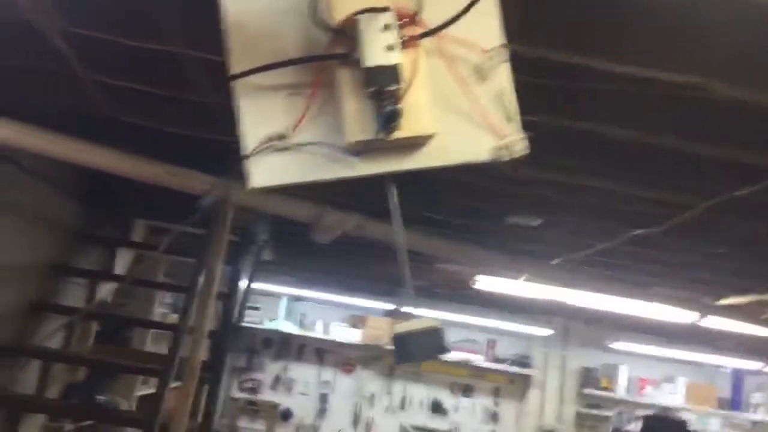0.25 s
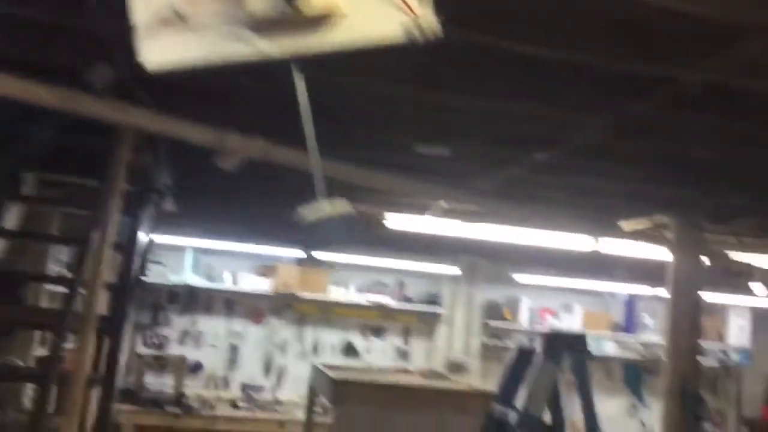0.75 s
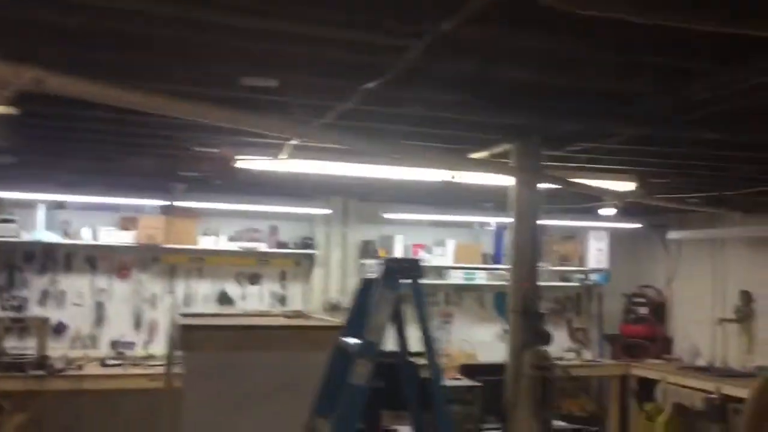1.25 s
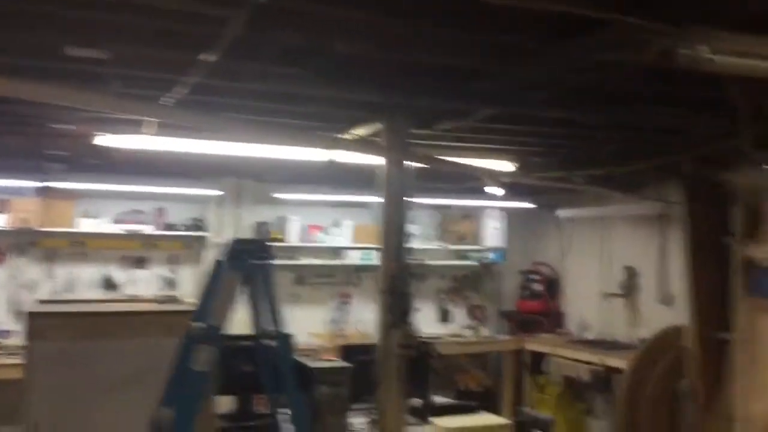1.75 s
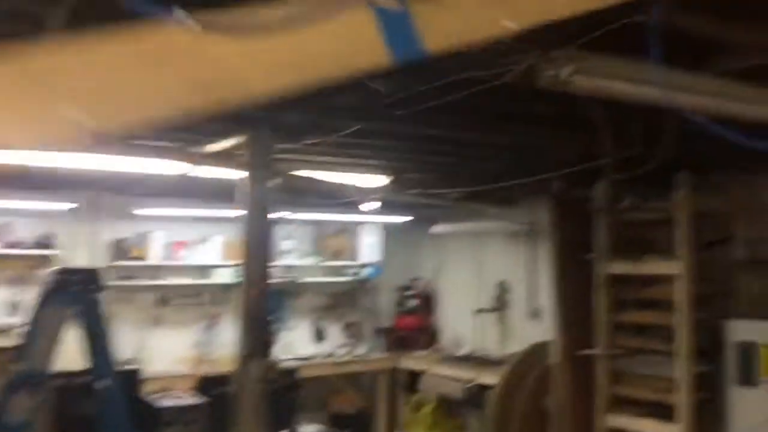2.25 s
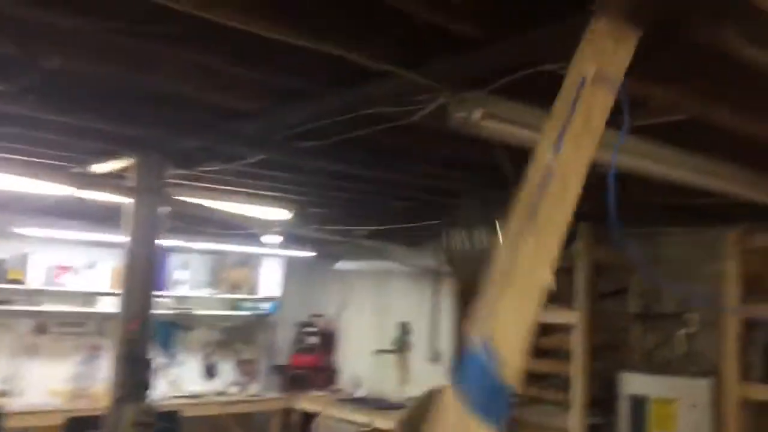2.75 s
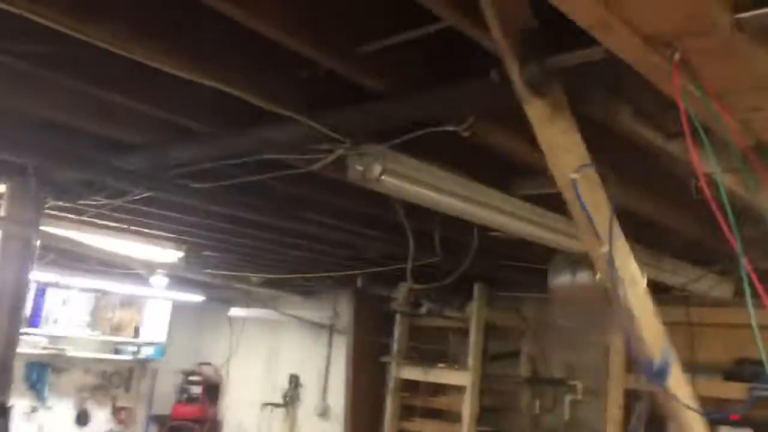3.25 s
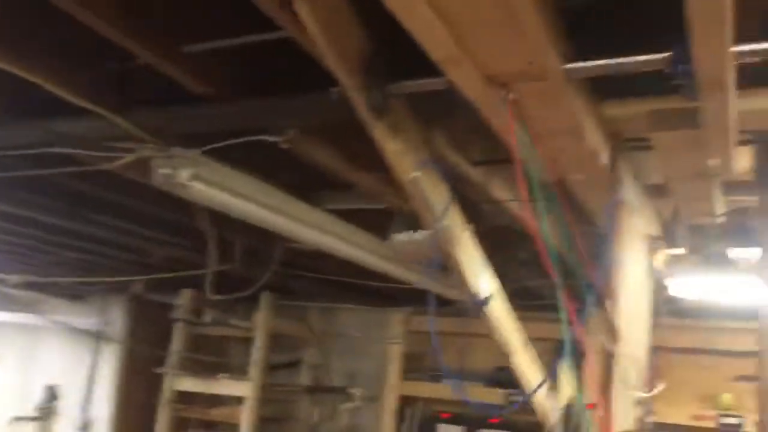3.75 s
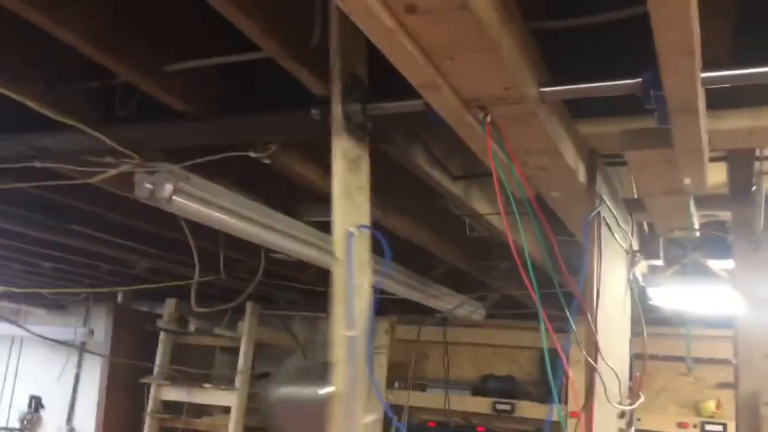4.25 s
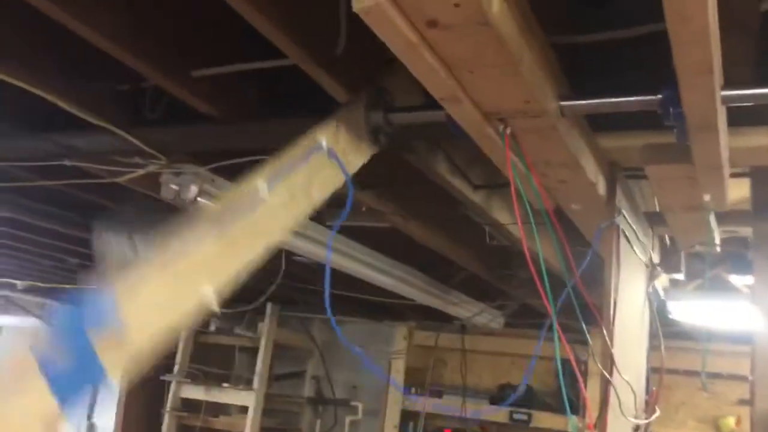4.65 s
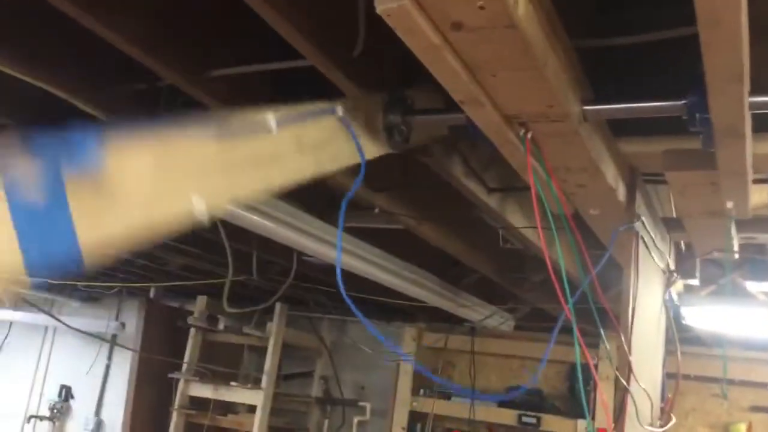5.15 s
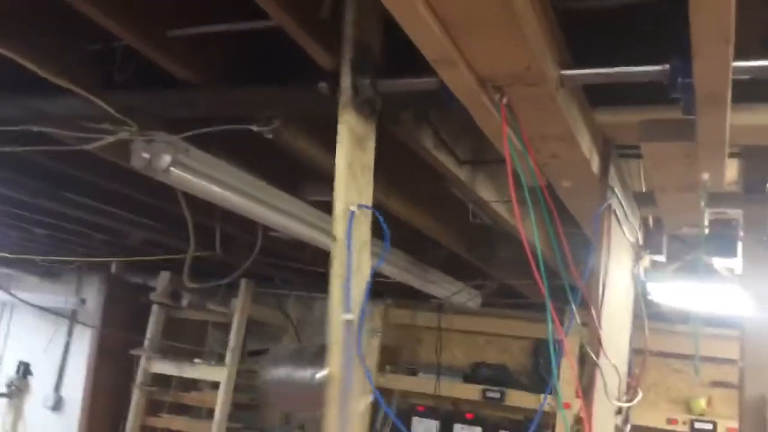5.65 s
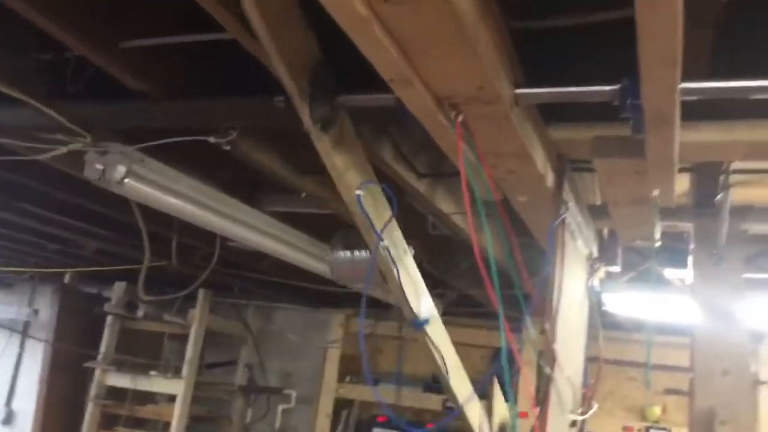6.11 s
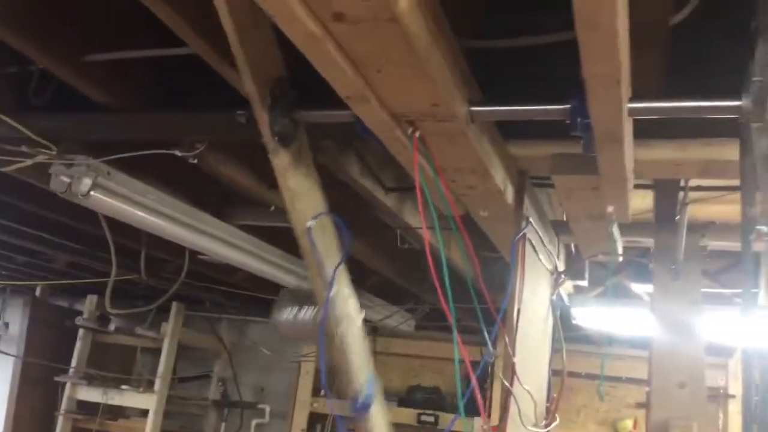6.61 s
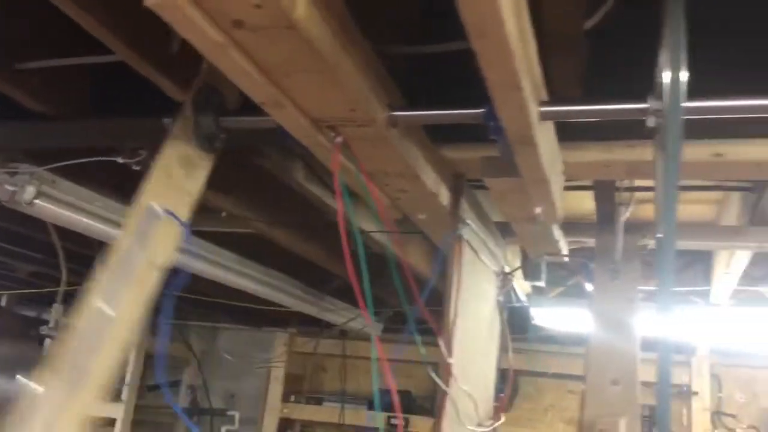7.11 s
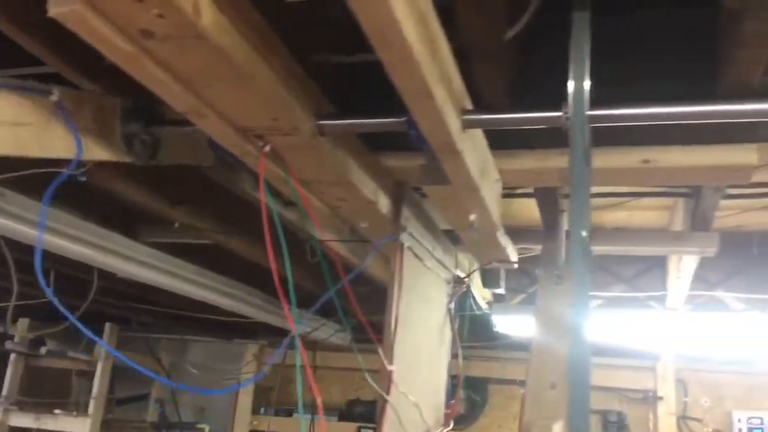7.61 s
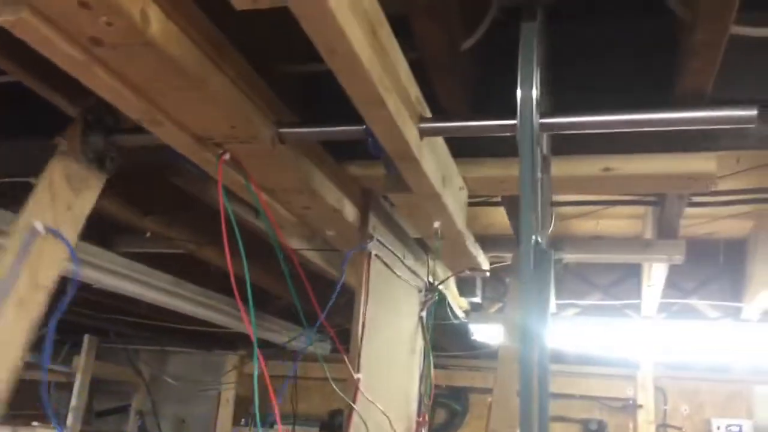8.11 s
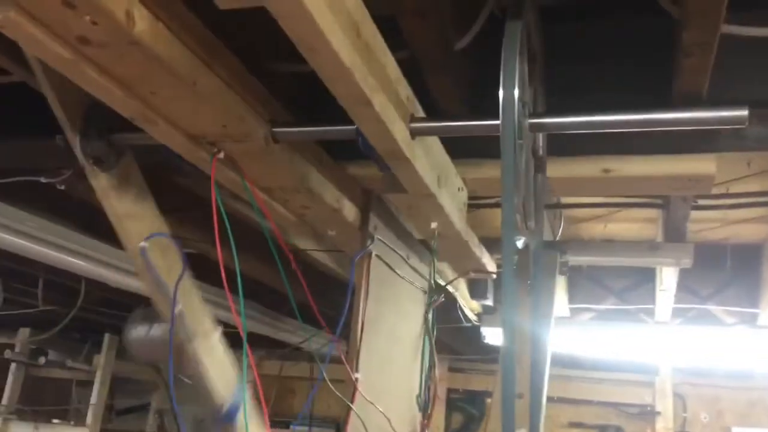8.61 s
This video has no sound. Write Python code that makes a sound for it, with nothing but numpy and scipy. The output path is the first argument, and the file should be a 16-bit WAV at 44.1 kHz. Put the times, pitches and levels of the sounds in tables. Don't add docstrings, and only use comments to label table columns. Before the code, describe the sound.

Three regular valve-and-piston strokes knock, clack and thump under a resonant timber ceiling, separated by creaky rubbing, small air leaks, shuffles and quiet lamp hum.

```python
import sys
import numpy as np
from scipy import signal
from scipy.fft import rfft, irfft, next_fast_len
from scipy.io import wavfile

SR = 44100
rng = np.random.default_rng(int(sys.argv[2]) if len(sys.argv) > 2 else 0)


def boost_factor(decibels):
    exponent = np.asarray(decibels, float) / 20
    return 10 ** exponent


def put_to_file(sound):
    columns = np.atleast_2d(sound).T
    safe = np.clip(columns, -1, 1)
    whole_steps = np.round(safe * 32767)
    wavfile.write(sys.argv[1], SR, whole_steps.astype(np.int16))


N = 391166
LEAD = 4410


def clock():
    return (np.arange(N + LEAD) - LEAD) / SR


def in_time(rows):
    s, *columns = np.transpose(rows)
    return [np.interp(clock(), s, column) for column in columns]


def at_hz(points, hz):
    points = np.array(points)
    return np.interp(np.log(hz + 1), np.log(points[:, 0]), points[:, 1])


def convolve(x, h):
    size = next_fast_len(len(x) + len(h))
    return irfft(rfft(x, size) * rfft(h, size), size)[:len(x)]


def causal(points):
    log_gain = np.log(boost_factor(at_hz(points, np.arange(2049) * SR / 4096)))
    fold = irfft(log_gain) * np.r_[1, 2 * np.ones(2047), 1, np.zeros(2047)]
    h = irfft(np.exp(rfft(fold)))
    return h / np.sqrt(np.sum(h ** 2))


def resonate(x, peaks):
    out = 0
    for k, (hz, width, db) in enumerate(peaks):
        r = np.exp(-np.pi * width / SR)
        zeros = [(1 - r * r) / 2, 0, (r * r - 1) / 2]
        poles = [1, -2 * r * np.cos(2 * np.pi * hz / SR), r * r]
        out = out + (-1) ** k * boost_factor(db) * signal.lfilter(zeros, poles, x + 1e-18)
    return out


def patchy(peaks, flicker_db):
    size, out = N + LEAD, 0
    knots = np.arange(0, size, 1500)
    for peak in peaks:
        flicker = np.interp(np.arange(size), knots, rng.standard_normal(len(knots)))
        band = resonate(resonate(rng.standard_normal(size), [peak]), [peak])
        out = out + boost_factor(flicker_db * flicker - peak[2]) * band
    return out / np.sqrt(np.mean(out ** 2) + 1e-20)


def ring(modes):
    t = np.arange(SR) / SR
    return sum(boost_factor(db - 60 * t / t60) * np.sin(2 * np.pi * hz * t) for hz, db, t60 in modes)


def add(track, s, sound):
    at = LEAD + round(s * SR)
    track[at:at + len(sound)] += sound[:len(track) - at]


def burst(rise, t60, hold=0.):
    t = np.arange(4000) / SR
    fade = boost_factor(-60 * np.maximum(t - rise - hold, 0) / t60)
    return rng.standard_normal(len(t)) * np.clip(t / rise, 0, 1) * fade


def swell(s, rise, hold, fall):
    t = clock()
    return 25 * np.minimum(np.minimum((t - s) / rise, (s + hold - t) / fall), 0)


# f/Hz, level/dB
REBOUND_COLOUR = [(50, -3), (400, 0), (1300, 0), (2200, -18), (9800, -40)]


def blows(rows, colour, rise, hold, t60, rebound_s, gain_db, push_db):
    near, impulse = np.zeros((2, N + LEAD))
    tint = causal(colour)
    dull = convolve(tint, causal(REBOUND_COLOUR))
    body, shudder = burst(rise, t60, hold), burst(0.00067, .08, 0.0038)
    body[round((rise + hold / 2) * SR)] += 9.0
    for s, db, back_db in rows:
        rattle = signal.lfilter([1, -.9], [1], burst(rise, t60, hold))
        strike = convolve(rattle, tint) + boost_factor(push_db) * convolve(body, dull)
        add(near, s, boost_factor(db + gain_db) * strike)
        rebound = convolve(shudder + 0.044 * burst(0.0012, 0.15, 0.0027), dull)
        add(near, s + rebound_s, boost_factor(db + gain_db + back_db) * rebound)
        add(impulse, s + rise, boost_factor(db) * tint)
    return near, impulse


# t/s, peak level/dB, rebound level below the blow/dB
SLAMS = [
    (-.046, -5.5, -3),
    (2.616, -5, -5),
    (5.279, -5.5, -7.5),
    (7.942, -6, -4),
]
# f/Hz, level/dB
SLAM_COLOUR = [(25, -19), (60, -11.5), (160, -5), (300, -4.5), (500, -4), (750, -14), (1200, -9.5),
               (2000, -6.5), (3200, -8.5), (5000, -8.5), (7500, -13), (8600, -9.5), (9700, -23),
               (12000, -63.5)]


def piston_slam():
    return blows(SLAMS, SLAM_COLOUR, rise=.003, hold=.006, t60=.0079, rebound_s=.018, gain_db=-7, push_db=-5)


# f/Hz, level/dB, t60/s
TIMBER = [(117.5, -7.5, 0.24), (160.25, 3, 0.33), (205.5, -0.5, 0.68), (254.8, -5, 0.79),
          (288.4, -2.5, 0.93), (418.3, -6, 0.79), (475, -5, .35), (530, -3.5, 0.37), (550, -5, 0.12),
          (685, -10.5, 0.63), (745, -1.5, 0.11), (1020, -14.5, 0.067), (1155, -5, 0.72), (66.6, -3, 0.15)]
# f/Hz, level/dB, t60/s
ROD = [(1240, -14, 0.47), (2184, -19.5, 0.96), (3660, -21.5, 0.18), (4400, -18.5, 0.25), (4070, -21, 0.2),
       (5750, -26, .2), (8650, -21.5, .15)]
# f/Hz, level/dB, t60/s
VALVE = [(130, 0.5, 0.21), (560, -13, .1), (1198, -5.5, .12)]


def structure(slam, knock, jerk):
    shaken = boost_factor(-45) * knock + boost_factor(-29) * slam + boost_factor(-35.5) * jerk
    return convolve(shaken, ring(TIMBER) + ring(ROD)) + boost_factor(-33.5) * convolve(knock, ring(VALVE))


# f/Hz, t60/s
ROOM_T60 = [(60, 0.73), (200, .7), (500, 0.67), (1000, 0.62), (2000, 0.45), (4000, 0.51), (8000, 0.32)]
# f/Hz, level/dB
ROOM_LEVEL = [(45, -1.5), (70, 7), (300, 2.5), (800, 4), (1200, 1.5), (3000, -9.5), (9000, -3.5)]
# f/Hz, t/s
ROOM_ARRIVAL = [(300, 0.026), (1500, 0.036), (2500, 0.00057)]


def room():
    t, out = np.arange(SR) / SR, 0
    edges = 40 * 2 ** np.arange(0, 8.1, .5)
    white = rng.standard_normal((2, SR))
    for k, (low, high) in enumerate(zip(edges, edges[1:])):
        band = signal.sosfilt(signal.butter(2, [low, high], "band", fs=SR, output="sos"), white[k % 2])
        hz = np.sqrt(low * high)
        build = np.clip((t - at_hz(ROOM_ARRIVAL, hz)) / 0.0046, 0, 1)
        t60 = np.clip(at_hz(ROOM_T60, hz), .05, 2)
        out = out + band * build * boost_factor(at_hz(ROOM_LEVEL, hz) - 60 * t / t60)
    return out


# t/s, share of the way
WALK = [(0, 0), (.6, .05), (1.6, .35), (1.9, .55), (2.3, .62), (3.1, .97), (8.87, 1.02)]
# multiple, level/dB, wall echo share, echo phase/rad, phase change over the walk/rad
HUM_LOW = [(1, -63, 0.93, .1, 2.3), (2, -66.5, 0.1, 0.56, 2), (3, -62, 0.97, 0.78, 6.7),
           (4, -68, 1, 2.8, 5.8)]
# multiple, level/dB
HUM_TOP = [(5, -71), (6, -77.5), (8, -79), (9, -78.5), (10, -89)]


def lamp_hum():
    way, = in_time(WALK)
    turn = 2 * np.pi * 120.05 * clock()
    hum = 0
    for k, db, echo, phase, change in HUM_LOW:
        standing = np.abs(1 + echo * np.exp(1j * (phase + change * way)))
        hum = hum + boost_factor(db) * standing * np.sin(round(k) * turn + rng.uniform(0, 5.5))
    for k, db in HUM_TOP:
        hum = hum + boost_factor(db + 0.5) * np.sin(round(k) * turn + rng.uniform(0, 5.5))
    wobble_db = 1.2 * np.interp(clock(), np.arange(-1, 10, .07), rng.standard_normal(158))
    return hum * boost_factor(wobble_db)


# f/Hz, level/dB
RUMBLE_COLOUR = [(12, -42.5), (25, -19), (70, -7.5), (120, -11), (250, -16), (500, -22), (800, -29.5),
                 (1300, -31.5), (2200, -33.5), (4000, -44), (8500, -58.5), (12000, -79.5)]


def joist_rumble():
    way, = in_time(WALK)
    swing_s, fastest_s = 2.6627, .6
    speed = np.cos(4 * np.pi * (clock() - SLAMS[0][0] - fastest_s) / swing_s)
    level_db = -60 + 3 * speed - 3 * way
    return boost_factor(level_db) * convolve(rng.standard_normal(N + LEAD), causal(RUMBLE_COLOUR))


# t after the slam/s, drag level/dB, air leak level/dB
BACKSWING = [(.3, -48, -86), (.38, -55, -76.5), (.43, -47, -62.5), (.53, -51.5, -69), (.57, -52, -59.5),
             (.71, -55.5, -55), (.8, -56, -78), (.87, -53.5, -98), (1.0, -76.5, -100.5)]
# t after the slam/s, drag level/dB, air leak level/dB
FORESWING = [(1.3, -69.5, -100), (1.741, -67, -79), (1.775, -62, -84), (1.792, -50.5, -55),
             (1.902, -43, -58.5), (1.969, -59.5, -71.5), (2.03, -55, -75), (2.118, -75, -77.5),
             (2.398, -76, -89)]
# drag level/dB, leak level/dB
PASSES = [(-1.5, -3), (0.75, 1.9), (1.9, -0.5), (0.5, 3.4), (0.43, 1.1), (0.9, 3.5), (2, 0.5)]


def load():
    halves = [(s, half) for s, *_ in SLAMS for half in (BACKSWING, FORESWING)]
    rows = []
    for (s, half), (drag, leak) in zip(halves, PASSES):
        rows += [(s + t, drag_db + drag, leak_db + leak) for t, drag_db, leak_db in half]
    return in_time(rows)


# f/Hz, width/Hz, level/dB
AXLE = [(644, 130, -1), (1206, 210, -0.5), (2156, 170, -9), (1750, 940, -15.5)]


def axle_rub():
    drag_db, _ = load()
    return boost_factor(drag_db - 7.5) * patchy(AXLE, flicker_db=2.0)


# f/Hz, width/Hz, level/dB
RUSTLE = [(2100, 630, 5.5), (3000, 890, -2.5), (4300, 4200, -6.5)]
# t/s, rustle level/dB, hiss level/dB, rise/s, fall/s
SHUFFLES = [
    (.87, -66, -82.5, 0.055, 0.29),
    (1.26, -74, -73, 0.086, 0.1),
    (3.53, -54, -71, 0.028, 0.15),
    (3.96, -69, -82, .08, .15),
    (4.208, -61.5, -69, 0.055, 0.27),
    (2.25, -69.5, -70, 0.29, 0.68),
]


def rustle():
    drag_db, _ = load()
    moves = sum(boost_factor(swell(s, rise, 0, fall) + db - 4) for s, db, _, rise, fall in SHUFFLES)
    return (boost_factor(drag_db - 15) + moves) * patchy(RUSTLE, flicker_db=3.0)


# f/Hz, width/Hz, level/dB
SEAL = [(5230, 900, -14), (6940, 3200, -7), (7980, 200, -0.5), (8964, 1500, -1), (9510, 300, 1)]


def seal_hiss():
    _, leak_db = load()
    rise, hold, fall = .022, .15, .088
    fill = sum(boost_factor(swell(s + rise, rise, hold, fall) - 58) for s, *_ in KNOCKS)
    moves = sum(boost_factor(swell(s, up, 0, down) + db - 3.5) for s, _, db, up, down in SHUFFLES)
    return (boost_factor(leak_db - 8.5) + fill + moves) * patchy(SEAL, flicker_db=4.0)


# t of the first after the slam/s, period/s, count
CHATTER = [
    (.3855, .02122, 18),
    (1.784, .0214, 13),
]
# t after the slam/s, peak level/dB, bright part above it/dB
CATCHES = [(0.429, -36, -23.5), (.555, -29, -25.5), (.682, -34, -23.5), (.746, -40.5, -23),
           (0.853, -40, -31.5), (1.784, -41.5, -7.5), (1.806, -37, -8), (1.893, -36.5, -10.5),
           (1.996, -42.5, -13), (2.018, -44, -17.5)]


def bearing_slips():
    dull, bright = np.zeros((2, N + LEAD + 3 * SR))
    drag_db, leak_db = load()

    def slip(s, dull_db, bright_db):
        add(dull, s, boost_factor(dull_db) * burst(.0008, .035))
        add(bright, s, boost_factor(bright_db) * burst(.0008, .035))

    for slam, *_ in SLAMS:
        for first, period, count in CHATTER:
            for s in slam + first + period * np.arange(count):
                at = min(LEAD + round(s * SR), N)
                luck = 2.5 * rng.standard_normal(2)
                slip(s, drag_db[at] + 12.5 + luck[0], leak_db[at] + 11 + luck[1])
        for t, db, bright_db in CATCHES:
            slip(slam + t, db, db + bright_db + 6)
    ticks = boost_factor(-15) * resonate(dull, RUSTLE)
    return (resonate(dull, AXLE) + ticks + resonate(bright, SEAL))[:N + LEAD]


# t/s, peak level/dB,
# centre f/Hz, swell/s
TAPS = [(1.081, -47, 700, 0.0043), (1.366, -35, 330, 0.0013), (1.409, -47, 324, 0.0023),
        (2.248, -44, 400, 0.0024), (2.248, -51.5, 1300, 0.0017), (3.50, -51.5, 2690, 0.021),
        (3.73, -52, 766, 0.021), (4.189, -57, 2990, 0.056), (6.385, -52.5, 858, .012),
        (6.129, -66.5, 3000, 0.0019), (.82, -49, 1600, 0.04), (3.47, -42, 216, 0.024)]


def taps():
    out = np.zeros(N + LEAD)
    for s, db, hz, rise in TAPS:
        peak = [(hz, 0.73 * hz, 0)]
        add(out, s, boost_factor(db + 11.5) * resonate(resonate(burst(rise, 0.06), peak), peak))
    return out


# f/Hz, width/Hz, level/dB
BUSH = [(1261, 140, 6.5), (1600, 550, -5.5), (3440, 280, -10), (800, 230, -8.5)]
# t/s, length/s, level/dB
WHINES = [
    (1.12, .4, -75.5),
    (3.76, .55, -80),
    (4.82, .24, -74),
    (6.72, .32, -76.5),
]


def bush_whine():
    whining = sum(boost_factor(db + 8 + swell(s, .15, length, .12)) for s, length, db in WHINES)
    return whining * patchy(BUSH, flicker_db=-0.5)


# t/s, peak level/dB, rebound level below the blow/dB
KNOCKS = [
    (2.401, -8.5, -7.5),
    (5.064, -9.5, -6.5),
    (7.728, -11, -4),
]
# f/Hz, level/dB
KNOCK_COLOUR = [(25, -26), (60, -5), (130, 2.5), (250, -8), (600, -5.5), (900, -14), (1200, -4.5),
                (1700, -9), (4000, -12), (5000, -22), (9000, -33.5), (12000, -63)]


def armature_knock():
    return blows(KNOCKS, KNOCK_COLOUR, rise=.004, hold=.004, t60=.05, rebound_s=.017, gain_db=-19, push_db=-8)


# t/s, peak level/dB, rebound level below the blow/dB
JERKS = [
    (2.482, -12.5, -12),
    (5.145, -14, -8.5),
    (7.809, -13, -10),
]
# f/Hz, level/dB
JERK_COLOUR = [(100, -21), (200, -9.5), (1100, -8), (2800, 0.5), (4000, -1), (5000, -9), (6500, -10),
               (8800, -13), (9700, -26), (12000, -58)]


def rod_jerk():
    return blows(JERKS, JERK_COLOUR, rise=.006, hold=.0026, t60=.056, rebound_s=.0076, gain_db=-9.5, push_db=-8.5)


# t/s, peak level/dB, rebound level below the blow/dB
SPITS = [
    (2.6045, -24, -40),
    (5.2675, -24, -40),
    (7.9315, -26, -40),
]
# f/Hz, level/dB
SPIT_COLOUR = [(240, -22.5), (400, -3), (1190, -5.5), (2110, -8.5), (5080, 4), (6280, -10.5), (8650, -9.5),
               (9620, -24), (12500, -51), (21200, -120)]


def exhaust_spit():
    near, _ = blows(SPITS, SPIT_COLOUR, rise=.0014, hold=.0073, t60=.056, rebound_s=.008, gain_db=-4, push_db=-11.5)
    return near


def scene():
    slam, slam_sent = piston_slam()
    knock, knock_sent = armature_knock()
    jerk, jerk_sent = rod_jerk()
    slips, near_by = bearing_slips(), taps()
    near = slam + knock + jerk + exhaust_spit() + slips + near_by
    near = near + structure(slam_sent, knock_sent, jerk_sent)
    sent = boost_factor(-10.5) * slam_sent + boost_factor(-20) * knock_sent + boost_factor(-17) * jerk_sent
    sent = sent + boost_factor(-30) * slips + boost_factor(-39) * near_by
    friction = axle_rub() + rustle() + seal_hiss() + bush_whine()
    beds = friction + lamp_hum() + joist_rumble()
    return (near + convolve(sent, room()) + beds)[None, LEAD:]


# f/Hz, share of time
DROPOUTS = [(700, 0.082), (1500, .18), (3000, 0.46), (5000, 0.29), (7000, 0.097), (8800, 0.058),
            (9600, 0.75)]


def thin_out(x):
    hz, t, spectrum = signal.stft(x, SR, nperseg=1024)
    band = (24 * np.log(1 + hz / 700)).astype(int)
    shape = (band.max() + 1, len(t))
    draw = rng.random(shape)
    spell = np.cumsum(rng.random(shape) < .33, axis=1) % len(t)
    luck = np.take_along_axis(draw, spell, axis=1)
    level = np.log(np.sum(np.abs(spectrum[0]) ** 2, axis=0) + 1e-12)
    before_blow = np.roll(level, -2) - level > 1.5
    in_blow = level - np.roll(level, 2) > 1.5
    spared = (level > -5.5) | before_blow | in_blow
    share = at_hz(DROPOUTS, hz)[:, None] * (hz[:, None] > 600)
    dropped = (luck[band] < share) & ~spared
    return signal.istft(spectrum * np.where(dropped, boost_factor(-26), 1), SR, nperseg=1024)[1][:, :N]


def roll_off(x):
    return signal.sosfilt(signal.butter(12, 9770, fs=SR, output="sos"), x)


def record(dry):
    top_cut = signal.cheby2(10, 50, 10544, fs=SR, output="sos")
    x = signal.sosfilt(top_cut, thin_out(dry))
    x = x / (1 + (x / .74) ** 8) ** .125
    return roll_off(x)


dry = scene()
out = record(dry)
put_to_file(out)
```